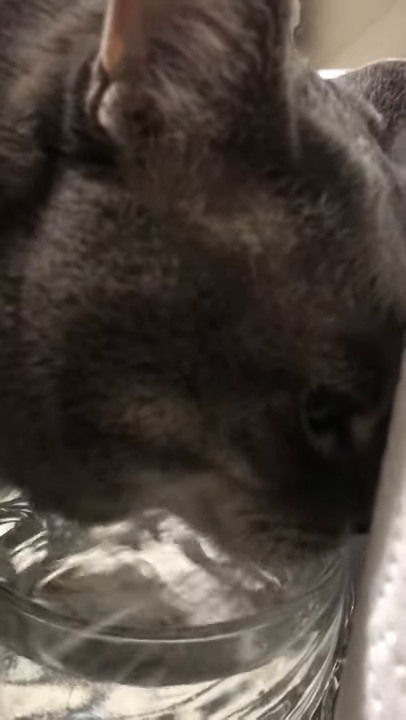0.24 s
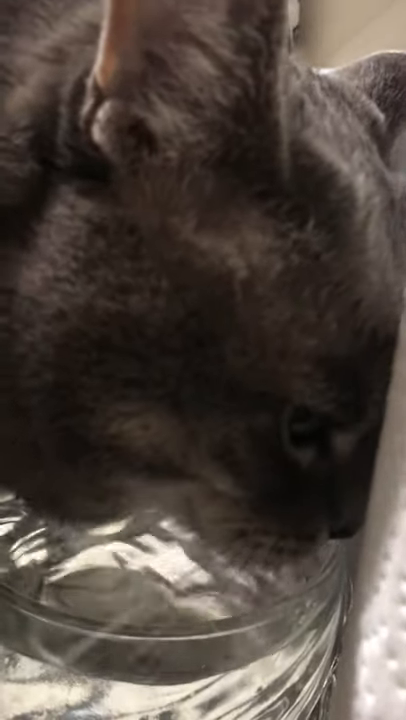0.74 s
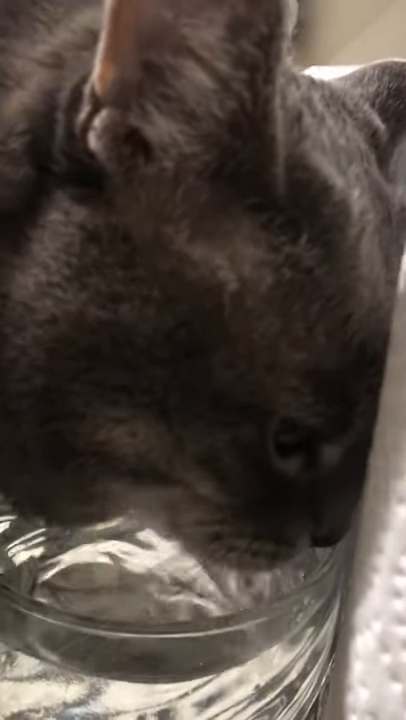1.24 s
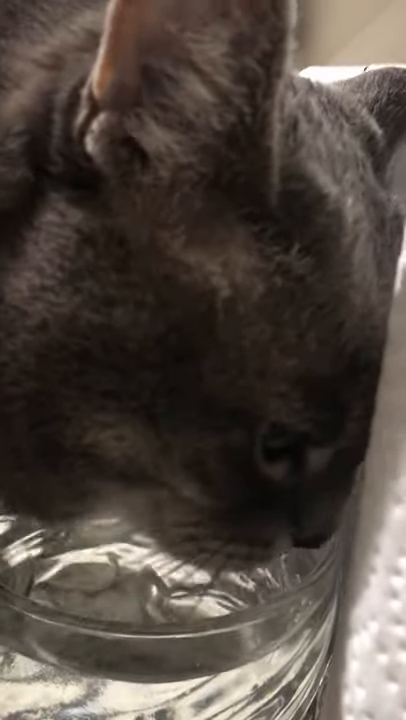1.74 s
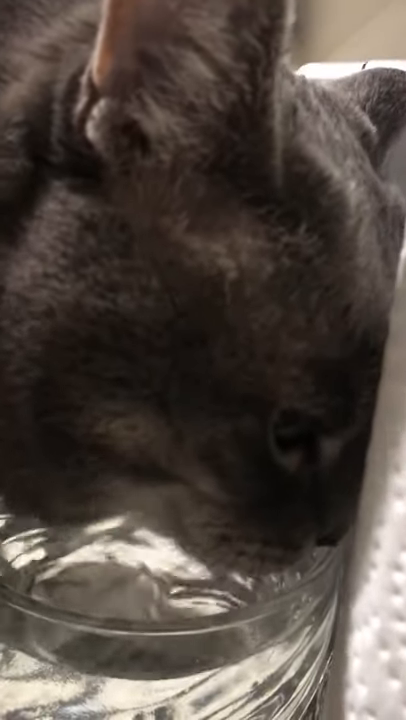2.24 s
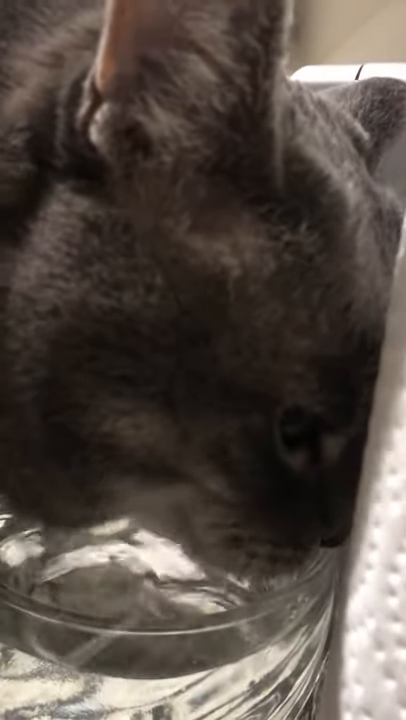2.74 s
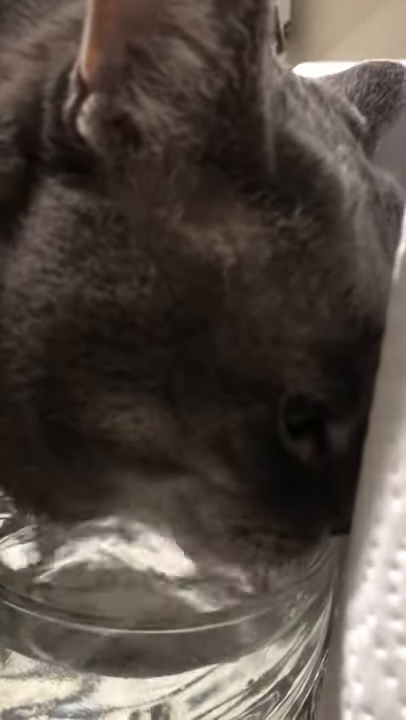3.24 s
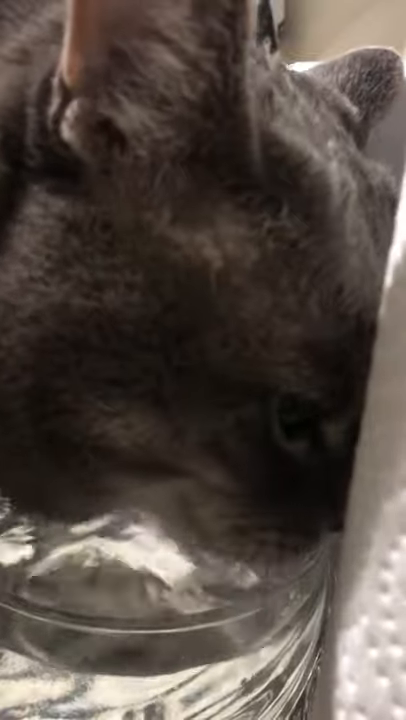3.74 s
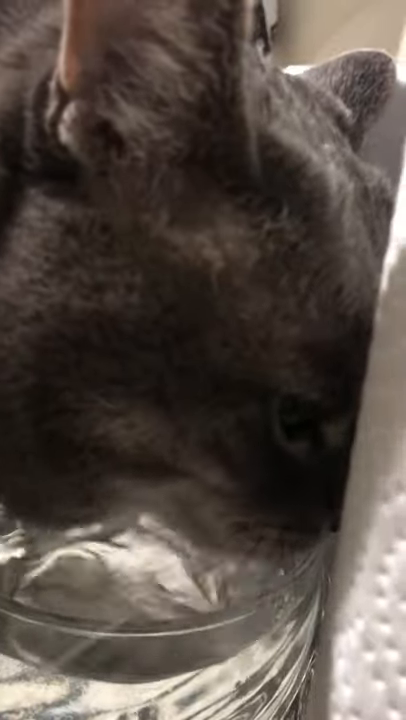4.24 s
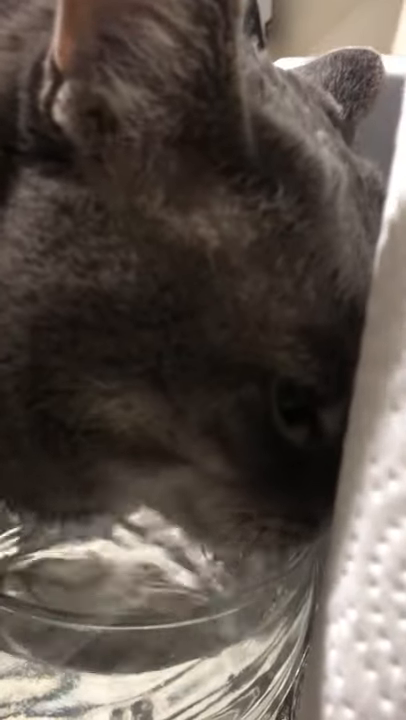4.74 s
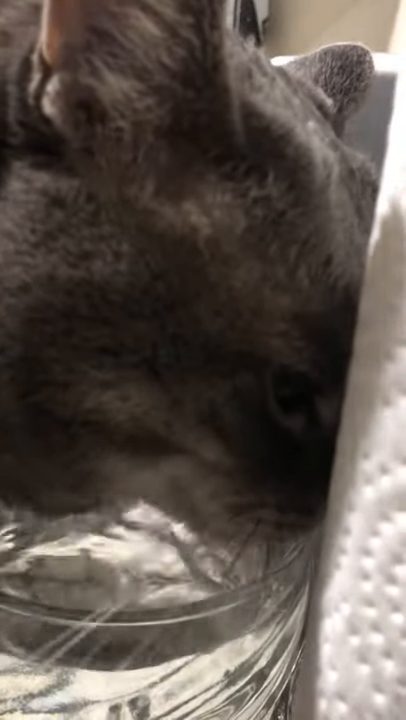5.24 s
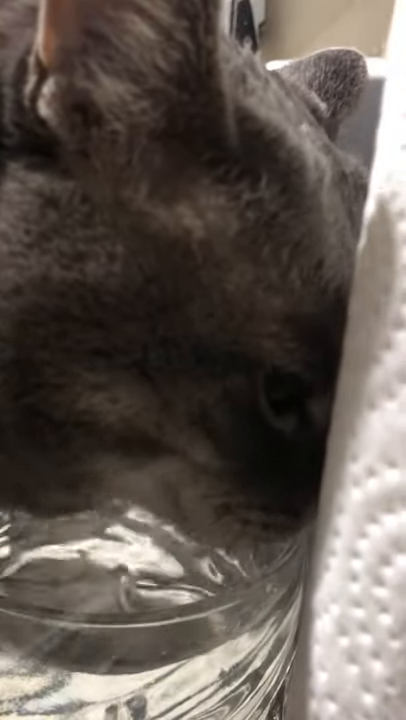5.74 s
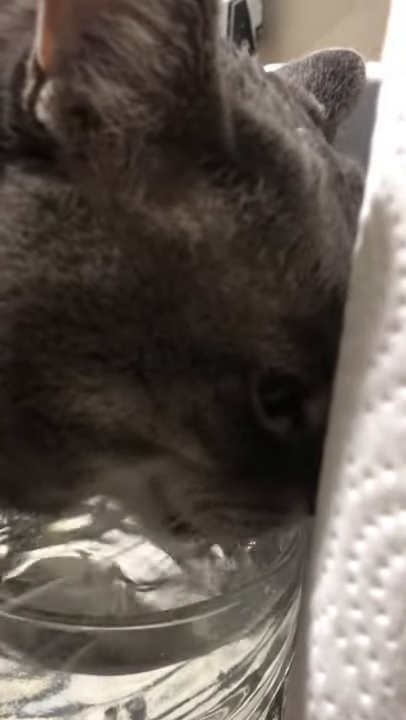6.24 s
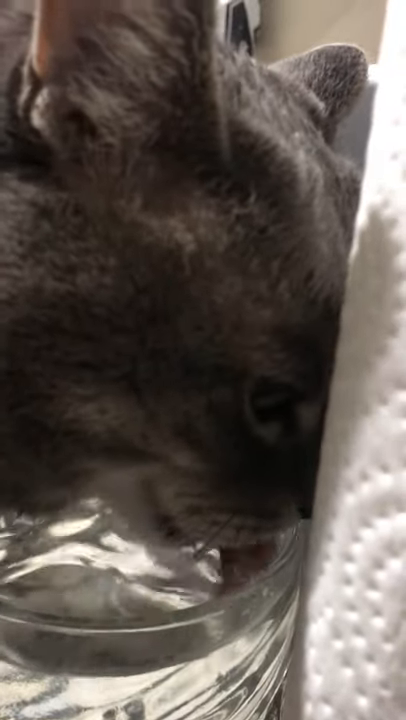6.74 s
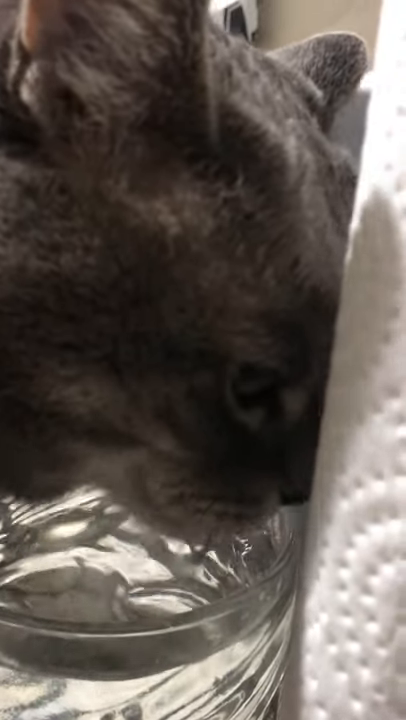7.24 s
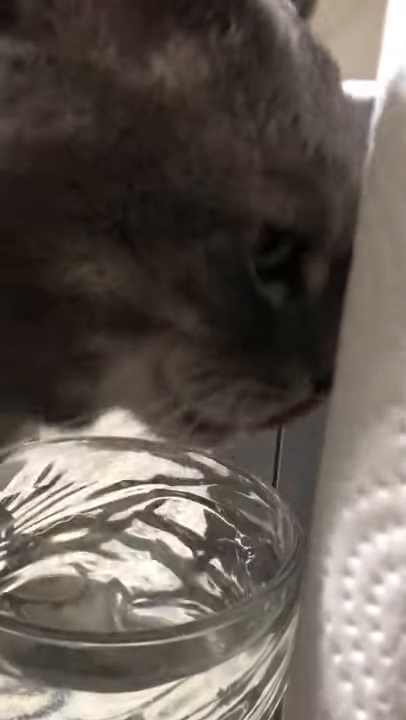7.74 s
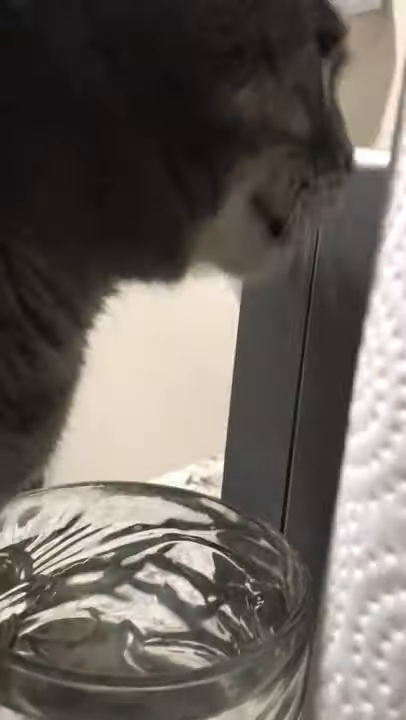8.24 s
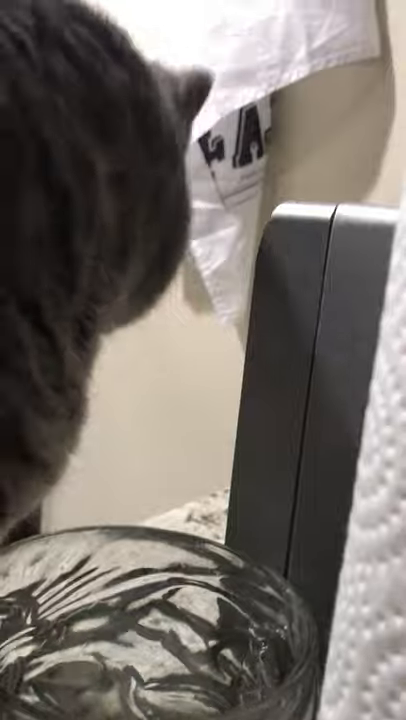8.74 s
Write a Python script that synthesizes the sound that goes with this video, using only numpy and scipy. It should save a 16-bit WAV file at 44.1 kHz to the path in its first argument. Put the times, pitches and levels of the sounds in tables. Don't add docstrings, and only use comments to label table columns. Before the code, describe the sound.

In a kitchen, with a phone microphone very close, a cat laps water from a glass bowl. From 0 to 2 seconds come light, quick wet ticks, small bubble plips and specks of spray, a few each second. A brighter, sharper pop stands out near 2.4. From 3 to 6 seconds the lapping is busiest: dense clusters of plops, crisp snaps, tiny high pings and pattering droplets, with slight taps on the glass near 3.2 and 5.3 and a deeper gulp around 4.1. Each has only a very short, glassy ring and tight nearby reflections. After 6 the sounds grow sparser; soft wet licks come around 7.4 to 7.8, and a last small click and drip at 8.3. Throughout, a refrigerator hums low and steady with quiet rumble, faint airy hiss and a barely audible high chatter, left alone at the end.

```python
import sys
import numpy as np
from scipy import signal
from scipy.fft import rfft, irfft, next_fast_len
from scipy.io import wavfile

SR = 44100
rng = np.random.default_rng(int(sys.argv[2]) if len(sys.argv) > 2 else 0)


def voltage_ratio(level):
    return 10 ** (np.asarray(level, float) / 20)


def materialize(psi):
    bounded = np.clip(np.atleast_2d(psi).T, -1, 1)
    quanta = np.round(bounded * 32767).astype(np.int16)
    wavfile.write(sys.argv[1], SR, quanta)


N = 397324
T = np.arange(N) / SR

# shaft_multiple, level_db (rms)
SHAFT_ORDERS = [(1, -61.5), (3, -62), (6, -80), (9, -92), (10, -83.5), (11, -88.5), (15, -84), (54, -95),
                (62, -100.5)]
# time_s, level_db
VALVE_CHATTER = [
    (0.0, -88.5),
    (1.73, -86),
    (2.73, -84),
    (6.92, -88),
    (7.22, -85),
    (9.0, -88),
]
# frequency_hz, density_db (per Hz)
ROOM_RUMBLE = [(20, -113), (32, -93.5), (45, -69), (56, -71), (91, -72), (105, -77), (130, -75.5),
               (151, -66.5), (190, -88), (214, -81), (235, -90.5), (278, -82), (330, -92), (450, -98.5)]
# frequency_hz, density_db (per Hz)
FAN_AIR = [(400, -100), (590, -93), (730, -100), (880, -95), (1150, -105), (1500, -105), (1650, -106),
           (1950, -111), (2200, -107), (2400, -111), (3000, -116)]
# frequency_hz, density_db (per Hz)
MIC_HISS = [(2300, -120), (3000, -116), (3200, -110), (3700, -112), (4500, -116), (6500, -118),
            (9000, -119), (13500, -121), (15900, -123)]
# time_s, level_db
FIZZ_LEVEL = [
    (0.0, -72.5),
    (2.03, -78.5),
    (3.99, -71),
    (4.18, -73.5),
    (5.16, -71.5),
    (9.0, -84),
]
# centre_s, length_s, level_db
LICKS = [(.19, 0.021, -79), (1.596, 0.047, -85), (3.937, 0.037, -79), (4.637, 0.016, -70),
         (5.04, 0.012, -74), (5.55, 0.011, -68), (7.444, 0.047, -78), (7.685, 0.053, -77),
         (7.794, 0.023, -68.5), (7.844, 0.013, -68), (8.338, .006, -73), (0.637, .015, -77)]
# start_s, peak_db, pitch_hz
DRIPS = [(0.0311, -67, 2530), (0.0583, -63, 2300), (0.0589, -62, 4820), (0.3364, -60.5, 2080),
         (0.5971, -65, 4820), (0.8523, -60, 5510), (1.2997, -65, 3900), (1.3421, -64, 2530),
         (1.4036, -61, 2990), (2.1332, -60, 2760), (2.1371, -57.5, 3780), (2.541, -66, 4820),
         (2.6385, -61, 3840), (2.6836, -62, 2760), (2.872, -66, 4590), (2.9459, -63, 5280),
         (2.9748, -64, 1830), (3.1293, -65, 2300), (3.2376, -53, 4130), (3.4368, -66, 2530),
         (3.4785, -62, 3680), (3.4782, -63, 1840), (3.5261, -67, 5050), (3.7693, -64, 2990),
         (3.7742, -66, 5050), (3.7797, -72, 5280), (3.8472, -65, 2520), (3.9098, -64, 4820),
         (4.0121, -61, 2760), (4.0142, -59, 5250), (4.0643, -65, 4130), (4.1215, -61, 2760),
         (4.3995, -64, 2760), (4.4289, -62, 2530), (4.5177, -61, 3880), (4.5873, -63, 2760),
         (4.7234, -65, 2680), (4.8066, -62, 2720), (4.8229, -63, 5280), (4.9993, -65, 4130),
         (5.116, -58.5, 2730), (5.127, -62, 4820), (5.3644, -58, 2300), (5.3748, -59, 4590),
         (5.4455, -62.5, 2700), (5.6012, -64, 4820), (5.6121, -60, 2520), (5.8591, -67, 4820),
         (5.9925, -63.5, 2990), (6.0295, -59, 4960), (6.0485, -66, 5050), (6.0624, -62, 2740),
         (6.2031, -67, 4590), (6.3299, -60, 4820), (6.4393, -61, 2300), (6.7081, -64, 4590),
         (7.1299, -66, 5510), (7.181, -65, 4820), (7.5114, -65, 4820), (8.0768, -63, 4300)]
# start_s, peak_db, pitch_hz, ring_t60_ms
BUBBLES = [(.0638, -53.5, 4500, 9), (.6012, -57.5, 3560, 6.9), (1.0125, -48.5, 3060, 7.5),
           (1.2869, -55.5, 2830, 7.6), (1.3961, -48, 2860, 15), (1.5705, -55.5, 2550, 7),
           (1.588, -58, 2700, 17), (1.9988, -49, 3000, 8.3), (2.1379, -58, 2550, 46),
           (2.2634, -50.5, 1500, 9.1), (2.3654, -36.5, 3380, 4.9), (2.6727, -45.5, 4780, 6.1),
           (4.1025, -54, 3530, 20), (4.1025, -55, 4800, 7), (4.112, -71, 3780, 5.3),
           (3.0016, -48.5, 3380, 12), (3.0989, -46.5, 2190, 4.3), (3.2371, -45, 1600, 24),
           (3.3313, -48, 2240, 6), (3.4727, -56, 2960, 7), (3.4841, -52.5, 1600, 29),
           (3.6811, -55, 2460, 8.7), (4.165, -52, 2560, 18), (4.4182, -57, 2280, 16),
           (4.564, -49, 2640, 14), (4.6343, -55, 4000, 11), (4.8057, -48, 4540, 5.9),
           (5.2615, -46.5, 4360, 17), (5.742, -46.5, 2720, 13), (6.7086, -54.5, 2110, 7.1),
           (6.7145, -53.5, 4500, 6.3), (8.3278, -58, 4470, 12)]
# start_s, peak_db, pitch_hz, ring_t60_ms
GULPS = [(0.5195, -55, 1320, 3.7), (1.8078, -53, 1510, 3), (2.367, -54, 2280, 18), (3.0160, -52.5, 1380, 6),
         (4.0922, -44, 950, 13), (4.095, -53, 610, 26), (4.5638, -52, 1300, 3.9), (5.2611, -43.5, 1640, 17),
         (5.7420, -55, 1640, 31), (6.1312, -50.5, 1890, 8.5), (3.2372, -52, 2700, 9),
         (4.564, -48, 750, 6.7), (6.1312, -51, 620, 8.8), (7.422, -60, 2080, 28), (7.455, -60, 1600, 41),
         (8.328, -60, 1910, 15), (.064, -60, 2000, 8)]
# start_s, peak_db, pitch_hz
PLOPS = [(.3414, -56, 4560), (.8522, -56, 2200), (1.1215, -54.5, 2270), (1.808, -54.5, 3560),
         (2.639, -53.5, 2590), (3.0156, -50, 3800), (3.024, -53, 4260), (3.5728, -50, 4400),
         (3.7065, -54, 4180), (3.719, -47, 3040), (3.964, -55, 4700), (4.0015, -51, 2740),
         (4.0923, -50, 2530), (4.099, -47, 3680), (4.1722, -50, 2500), (6.1305, -67, 3600),
         (5.041, -57, 2840), (5.1166, -49.5, 4940), (5.252, -53, 3330), (5.292, -48.5, 4400),
         (5.365, -46.5, 4560), (5.5051, -55, 4600), (5.6202, -48.5, 4930), (5.791, -52.5, 2590),
         (6.097, -57, 4200), (6.1311, -50, 2500), (6.1932, -55, 2450), (6.442, -53.5, 4800),
         (7.748, -55.5, 4330), (8.0341, -50, 3150)]
# start_s, peak_db, pitch_hz
SPECKS = [(0.0638, -55, 7810), (0.0643, -56, 13550), (0.0877, -53, 10800), (0.2259, -58, 11250),
          (0.2265, -58, 8270), (0.3707, -53, 11020), (0.3778, -59, 7120), (0.3865, -61, 8500),
          (0.4104, -62, 7810), (0.4567, -57, 10110), (0.8523, -59, 15160), (0.9127, -56, 10800),
          (0.953, -56, 8270), (0.953, -56, 11020), (1.0129, -61, 9420), (1.2529, -59, 8730),
          (1.2866, -57, 9420), (1.6915, -61, 6200), (1.8678, -61, 9880), (1.876, -56, 11480),
          (2.1383, -48, 11250), (2.1498, -58, 9650), (2.2374, -58, 10800), (2.2379, -56, 12860),
          (2.2902, -61, 7350), (2.3952, -57, 13550), (2.596, -61, 6890), (2.6265, -61, 8500),
          (2.6787, -54, 13780), (2.6847, -60, 14700), (2.781, -58, 6200), (2.867, -56, 13320),
          (2.8986, -59, 14700), (2.8991, -58, 8500), (3.002, -59, 10340), (3.0161, -60, 9650),
          (3.0243, -58, 6200), (3.0836, -52, 15160), (3.1326, -55, 10800), (3.2371, -53, 14240),
          (3.2621, -61, 6000), (3.2719, -60, 12860), (3.3171, -61, 8040), (3.3171, -60, 5970),
          (3.4733, -59, 12860), (3.5038, -57, 5970), (3.5544, -57, 11480), (3.5609, -60, 6660),
          (3.5729, -55, 9880), (3.593, -52, 14470), (3.5979, -60, 10800), (3.6001, -60, 13550),
          (3.7492, -59, 5970), (3.7699, -60, 6430), (3.7955, -54, 6430), (3.8129, -62, 6200),
          (3.8303, -60, 7120), (3.8434, -58, 6890), (3.8434, -60, 15390),
          (3.8466, -59, 6890), (3.9092, -58, 8960), (3.9642, -56, 5740), (3.9653, -56, 14930),
               (3.9653, -53, 11480), (4.0012, -59, 8040), (4.0137, -60, 14700), (4.0921, -57, 5740),
               (4.255, -58, 8040), (4.2548, -61, 10570), (4.2858, -57, 15390), (4.3326, -61, 8270),
               (4.3952, -56, 11480), (4.418, -48, 8040), (4.4425, -51, 13550), (4.5258, -54, 5970),
               (4.5291, -59, 8040), (4.5889, -58, 15160), (4.6298, -56, 14700), (4.6488, -63, 10570),
               (4.7685, -60, 6200), (4.8061, -60, 10340), (4.8061, -59, 14700), (4.8061, -57, 8040),
               (5.0951, -56, 7810), (5.1517, -62, 6890), (5.2447, -62, 6200), (5.2545, -48, 8270),
               (5.261, -47, 6200), (5.2921, -60, 14700), (5.3721, -51, 14930), (5.3753, -52, 12630),
               (5.3976, -56, 10800), (5.4455, -55, 9880), (5.5005, -57, 6000), (5.6208, -55, 9190),
               (5.7443, -52, 8500), (5.7454, -58, 14470), (5.8434, -54, 10110), (5.8651, -60, 10570),
               (5.9244, -60, 8960), (6.0551, -61, 10570), (6.1487, -55, 13780), (6.3332, -57, 5970),
               (6.4692, -56, 7500), (6.5857, -51.5, 6160), (6.7288, -60, 10800), (6.7364, -55, 8100),
               (6.738, -54, 10800), (6.8687, -59, 14010), (6.8692, -57, 11250), (6.9077, -55, 8500),
               (7.1103, -61, 8730), (7.1108, -58, 11020), (7.1745, -56, 7760), (7.3242, -56, 10570),
               (7.5185, -62, 7120), (7.7873, -56, 9880), (7.8406, -57, 11480)]
# start_s, peak_db, pitch_hz
TEARS = [(.0917, -58, 15310), (.6298, -59, 11050), (1.1613, -59.5, 11220), (1.9811, -54.5, 8100),
         (2.134, -55, 11200), (2.141, -52.5, 8250), (2.7344, -51.5, 7700), (2.9837, -54, 10300),
         (3.1161, -51.5, 8500), (3.2265, -52, 8940), (3.2363, -48, 8460), (3.272, -56.5, 6040),
         (3.6104, -56, 8160), (3.6199, -57, 14920), (3.7053, -54, 10500), (3.7229, -53.5, 8000),
         (3.795, -56, 11200), (4.4164, -51, 15780), (4.6343, -59, 14970), (4.9088, -46, 15550),
         (5.1163, -52, 15300), (5.261, -47.5, 8500), (5.375, -55, 8460), (5.5057, -53, 10030),
         (5.7402, -57, 9900), (6.5835, -57, 9400), (6.5923, -55, 9970), (6.7575, -55, 15000),
         (7.6806, -60, 10500)]
# start_s, peak_db, pitch_hz
SNAPS = [(.1868, -57, 10290), (.852, -54.5, 7040), (1.2263, -50.5, 11500), (1.588, -50.5, 10800),
         (1.6165, -56, 11350), (1.8107, -54, 13400), (2.372, -52, 10900), (2.495, -46.5, 7800),
         (2.639, -53.5, 11000), (2.8624, -49, 10100), (2.9452, -50.5, 13500), (3.1316, -53, 8060),
         (3.1853, -53, 13370), (3.3488, -55, 10590), (3.4732, -54, 7600), (4.287, -46, 8060),
         (4.4213, -52, 8550), (4.442, -49, 9500), (4.7596, -54, 14940), (4.9966, -48.5, 9800),
         (5.2537, -45, 10000), (5.6126, -53, 11090), (5.6458, -53, 11400), (5.744, -51, 5900),
         (5.8761, -44.5, 13600), (7.0243, -50.5, 11100), (7.1912, -54, 8750), (7.3308, -53, 11300),
         (7.426, -50.5, 9900), (8.3274, -49, 8000)]
# start_s, peak_db, pitch_hz
PINGS = [(.2062, -50, 11860), (.7424, -61, 8250), (0.898, -50, 11100), (1.0088, -55, 11390),
         (1.6972, -51, 9800), (2.2415, -54, 8400), (2.264, -51, 10300), (2.3652, -40, 9000),
         (2.6784, -50, 6630), (2.6836, -52, 8270), (2.7398, -45, 10800), (2.776, -48.5, 9400),
         (3.4608, -56, 11260), (3.5726, -47.5, 5770), (4.0577, -53.5, 5370), (4.4254, -43.5, 6900),
         (4.518, -42, 9700), (4.662, -50, 12770), (5.1215, -38.5, 11600), (5.3834, -52, 8450),
         (5.3944, -52, 6700), (5.8599, -51, 10620), (5.981, -44.5, 7700), (5.9869, -47, 8270),
         (6.196, -57, 11500), (6.3292, -50, 9540), (6.342, -49, 8200), (6.8564, -51.5, 6860),
         (6.861, -51, 8100), (7.511, -54, 7000)]
# start_s, peak_db, pitch_hz
DROPLETS = [(.3326, -59, 5900), (.3866, -57, 15570), (1.338, -61, 2400), (1.6906, -60, 10790),
            (2.1378, -64, 4270), (2.1932, -61.5, 8400), (2.3612, -55, 2420), (2.3632, -54, 12300),
            (2.3672, -50, 13600), (2.742, -58, 8700), (2.8986, -63, 8420), (2.9808, -55.5, 6500),
            (3.0164, -57.5, 5840), (3.5035, -62, 8010), (3.965, -55, 8600), (3.9922, -59, 6900),
            (4.3322, -63, 5500), (4.514, -52, 10700), (4.5143, -59, 5470), (4.9878, -57, 7900),
            (5.3016, -59, 6200), (5.3833, -57, 12100), (5.3978, -61, 10300), (5.636, -60, 6830),
            (5.7888, -58.5, 7850), (5.8435, -52.5, 4700), (6.0295, -61, 7700), (6.7363, -61, 8300),
            (7.3447, -59, 14320), (7.68, -63, 6000), (8.018, -60, 3000)]
# start_s, length_s, peak_db, pitch_hz
SQUEEZES = [
    (.5192, .003, -61, 5700),
    (.5193, .006, -57, 2700),
    (.5194, .006, -58, 1400),
    (2.857, .011, -53, 2110),
    (4.552, .005, -60, 3550),
    (4.5521, .007, -57, 2250),
    (4.5525, .007, -58, 1550),
    (5.2515, .007, -58, 6200),
    (5.256, .005, -57, 1700),
]
# start_s, level_db
KNOCKS = [
    (3.2373, -45),
    (5.26, -43),
    (8.326, -60),
]
# pitch_hz, level_db, ring_t60_s
BOWL_MODES = [(1640, -8.5, 0.017), (2230, -8, 0.021), (4530, -14, 0.03), (6280, -5, 0.012),
              (8500, 4.5, 0.0025), (11000, 0, 0.0051)]
# centre_hz, width_hz, gain_db
PORT_NOTCHES = [(4980, 310, -2), (7600, 310, -3.5), (10460, 500, -4.5)]


def evened(x):
    return x / np.sqrt(np.mean(x ** 2) + 1e-20)


def curve(rows):
    return np.interp(T, *np.transpose(rows))


def add(mix, start_s, sound):
    part = mix[round(start_s * SR):][:len(sound)]
    part += sound[:len(part)]


def slow(rate_hz):
    lowpass = signal.butter(2, rate_hz, fs=SR, output="sos")
    return evened(signal.sosfilt(lowpass, rng.standard_normal(N)))


def ring(hz, t60, rise, glide=0., size=2600):
    t = np.arange(size) / SR
    shape = (1 - np.exp(-t / rise)) * voltage_ratio(-60 * t / t60)
    bent_time = t + glide * t ** 2 / (2 * t60)
    return shape / shape.max() * np.sin(2 * np.pi * hz * bent_time)


def crack(hz, t60, rise, cycles=3.1):
    spray = rng.standard_normal(500)
    t = np.arange(len(spray)) / SR
    grain = ring(hz, cycles / hz, .00002, size=120)
    band = np.convolve(np.convolve(spray, grain), grain)[:len(spray)]
    return evened(band) * (1 - np.exp(-t / rise)) ** 2 * voltage_ratio(-60 * t / t60)


def scatter(at, size, shapes):
    shapes = np.array(shapes)
    length = shapes.shape[1]
    out = np.zeros(N + length)
    grains = size[:, None] * shapes[rng.integers(0, len(shapes), len(at))]
    np.add.at(out, at[:, None] + np.arange(length), grains)
    return evened(out[:N])


def noise(points):
    size = next_fast_len(N)
    hz = np.fft.rfftfreq(size, 1 / SR)
    f, db = np.transpose(points)
    colour = voltage_ratio(np.interp(np.log(hz + 1), np.log(f), db, left=-150, right=-150))
    return irfft(rfft(rng.standard_normal(size)) * colour * np.sqrt(SR / 2), size)[:N]


def refrigerator():
    turns = 59.2 * T
    hum = voltage_ratio(-52.5 + 0.58 * slow(1.2)) * np.sin(2 * np.pi * 119.8 * T)
    orders = np.zeros(N)
    for multiple, db in SHAFT_ORDERS:
        orders += voltage_ratio(db + 1.9 * slow(2.5)) * np.sin(2 * np.pi * (multiple * turns + rng.random()))
    beat = np.exp(3.3 * np.cos(2 * np.pi * (turns + .15 * slow(25))))
    beat = beat * voltage_ratio(2 * slow(40))
    valve = signal.oaconvolve(beat * rng.standard_normal(N), ring(12300, 0.0027, 0.00039))[:N]
    return np.sqrt(2) * (hum + orders) + voltage_ratio(curve(VALVE_CHATTER) + 1.0) * evened(valve)


def background_air():
    return noise(ROOM_RUMBLE) + noise(FAN_AIR) + noise(MIC_HISS)


def fizz(stir, spread_db=5.5):
    at = rng.integers(0, N, size=30000)
    size = voltage_ratio(spread_db * np.minimum(rng.exponential(1, len(at)), 3))
    grains = [ring(hz, 7 / hz, .0001, size=160) * (hz / 5000) ** 0.14
              for hz in np.geomspace(2000, 15000, num=12)]
    drops = scatter(at, size, grains)
    crowding = np.exp(-abs(np.linspace(-4, 4, num=2601) - .3))
    near = signal.oaconvolve(abs(stir) ** 0.63, crowding, "same")
    licks = sum(voltage_ratio(db) * np.exp(-((T - s) / length) ** 2 * 2) for s, length, db in LICKS)
    return (voltage_ratio(-48.5) * near + licks + voltage_ratio(curve(FIZZ_LEVEL) - 12.0)) * drops


def trickle(per_s=140, spread_db=8.0):
    last_lap_s = 7.9
    at = np.flatnonzero(rng.random(N) < per_s / SR * np.exp(.6 * slow(12)))
    size = voltage_ratio(spread_db * np.minimum(rng.exponential(1, len(at)), 1.4))
    grains = [ring(hz, 12 / hz, 0.00035, 0.043, size=400) * (hz / 6000) ** 0.097
              for hz in np.geomspace(2200, 15000, num=14)]
    return voltage_ratio(curve(FIZZ_LEVEL) - 8) * scatter(at, size, grains) * (T < last_lap_s)


def drips(water):
    for s, db, hz in DRIPS:
        add(water, s, voltage_ratio(db + 3.5) * ring(hz, 25 / hz, 0.00033, 0.027, size=900))


def bubbles(water, shocks):
    plops = [(s, db, hz, 1000 * 12.4 / hz) for s, db, hz in PLOPS]
    for s, db, hz, ms in [*BUBBLES, *GULPS, *plops]:
        glide = .07 if hz > 1200 else -.9
        add(water, s, voltage_ratio(db) * ring(hz, ms / 1000, 0.00025, glide))
        add(water, s - .0015, voltage_ratio(db - 10.5) * crack(0.64 * hz, 0.027, 0.00092, cycles=2.4))
        add(shocks, s, voltage_ratio([db - 21]))


def specks(water):
    for s, db, hz in SPECKS:
        add(water, s, voltage_ratio(db + 0.5) * ring(hz, 16 / hz, 0.00042, size=300))


def tongue_slaps(water):
    for s, db, hz, ms in GULPS:
        add(water, s, voltage_ratio(db + 5.5) * ring(1430, 0.00071, .0001, size=200))


def breaking_films(water, shocks):
    films = [(*row, -13) for row in TEARS]
    films += [(*row, -20) for row in SNAPS]
    films += [(s, db, hz, -75.5 - db) for s, db, hz in PINGS]
    for s, db, hz, crack_db in films:
        add(water, s, voltage_ratio(db) * ring(hz, 30 / hz, 0.000077, 0.048))
        add(water, s - .0004, voltage_ratio(db + crack_db + 21.5) * crack(0.95 * hz, 0.0064, 0.00041))
        add(shocks, s, voltage_ratio([db + .5 * crack_db]))


def droplets(water):
    for s, db, hz in DROPLETS:
        add(water, s - .0005, voltage_ratio(db + 11) * crack(hz, 0.0077, 0.00069, cycles=5.5))


def squeezes(water):
    for s, length, db, hz in SQUEEZES:
        add(water, s, voltage_ratio(db + 6.5) * crack(hz, 3 * length, 0.00068, cycles=1.45))
        t = np.arange(0, length, 1 / SR)
        swell = np.sin(np.pi * (t / length) ** .7)
        add(water, s, voltage_ratio(db) * swell * np.sin(2 * np.pi * hz * t))


def glass_knocks():
    knocks = np.zeros(N)
    for s, db in KNOCKS:
        add(knocks, s, voltage_ratio([db]))
    return knocks


def bowl_ringing(push):
    bowl = sum(voltage_ratio(db) * ring(hz, t60, 0.00094) for hz, db, t60 in BOWL_MODES)
    return signal.oaconvolve(push, bowl)[:N]


def lapping():
    water, shocks = np.zeros(N), np.zeros(N)
    drips(water)
    bubbles(water, shocks)
    specks(water)
    tongue_slaps(water)
    breaking_films(water, shocks)
    droplets(water)
    squeezes(water)
    knocks = glass_knocks()
    spray = fizz(shocks + knocks) + trickle()
    push = voltage_ratio(-11.5) * knocks + voltage_ratio(-4.5) * shocks + voltage_ratio(-29.0) * spray
    return water + spray + bowl_ringing(push)


def nearby(x):
    t = np.arange(3000) / SR
    sparse = rng.standard_normal(3000) * (rng.random(3000) < .08)
    taps = sparse * voltage_ratio(-60 * t / 0.02) * (t > .002)
    return signal.oaconvolve(x, taps / np.linalg.norm(taps))[:N]


def scene():
    cat = lapping()
    return (cat + voltage_ratio(-12.5) * nearby(cat) + refrigerator() + background_air())[None]


def top_cut(x):
    return signal.sosfilt(signal.butter(12, 16480, fs=SR, output="sos"), x)


def record(dry):
    size = next_fast_len(N)
    hz = np.fft.rfftfreq(size, 1 / SR)
    port_db = sum(db * np.exp(-((hz - f) / width) ** 2) for f, width, db in PORT_NOTCHES)
    heard = irfft(rfft(dry, size) * voltage_ratio(port_db), size)[:, :N]
    edge = signal.firwin(101, 16000, window=("kaiser", 7), fs=SR)
    finished = signal.oaconvolve(heard, edge[None], "same")
    return top_cut(finished)


dry = scene()
out = record(dry)
materialize(out)
```